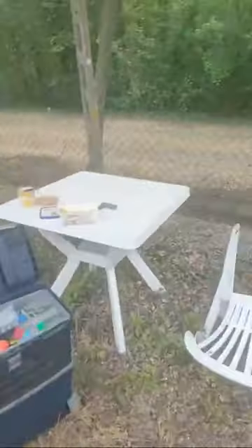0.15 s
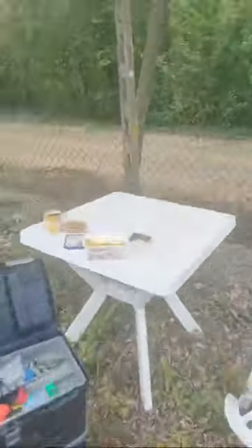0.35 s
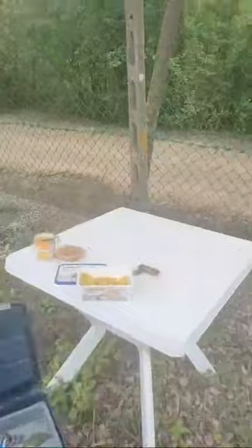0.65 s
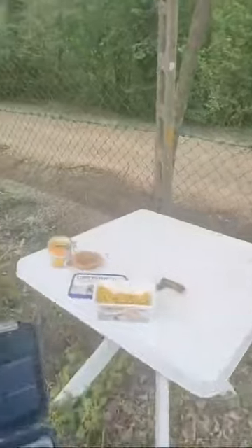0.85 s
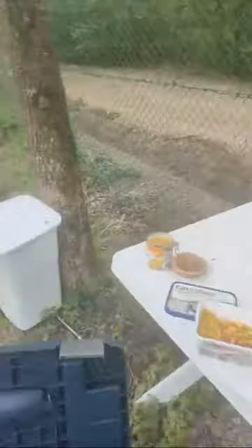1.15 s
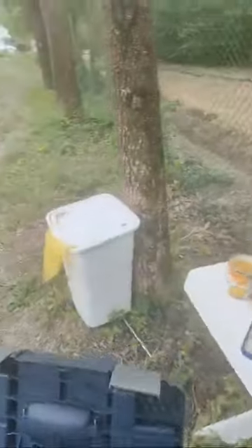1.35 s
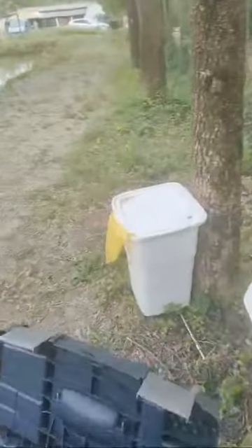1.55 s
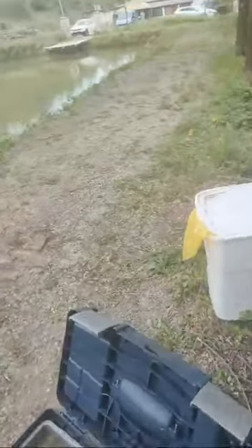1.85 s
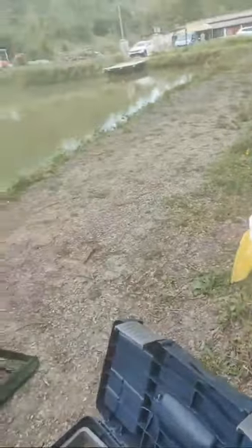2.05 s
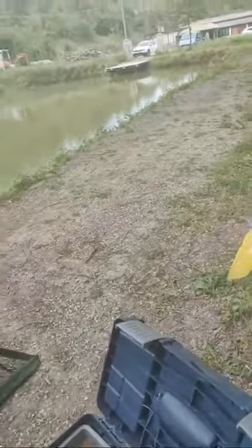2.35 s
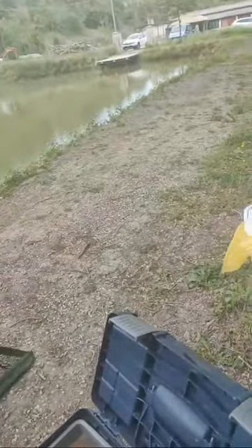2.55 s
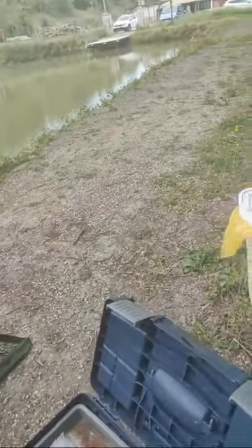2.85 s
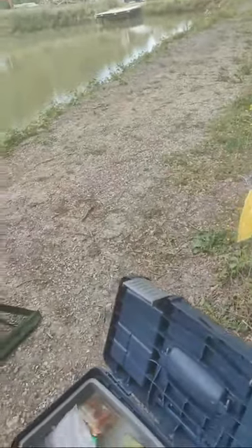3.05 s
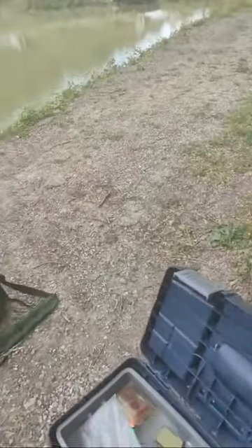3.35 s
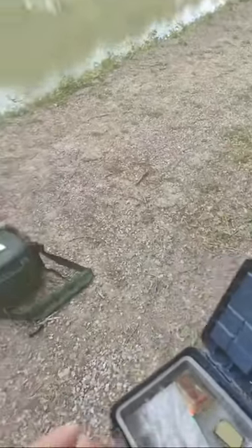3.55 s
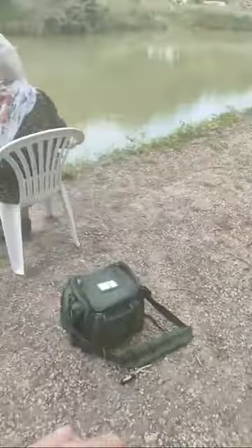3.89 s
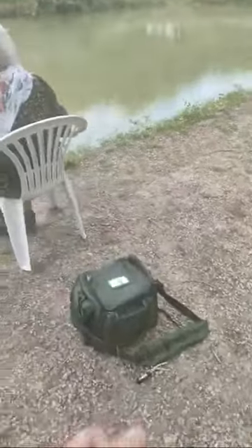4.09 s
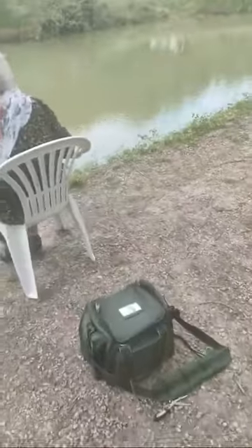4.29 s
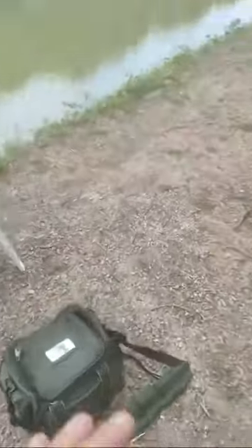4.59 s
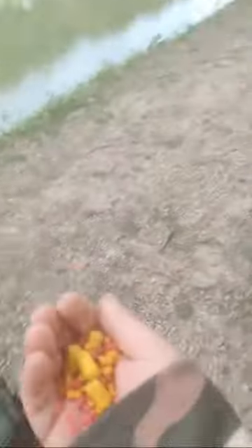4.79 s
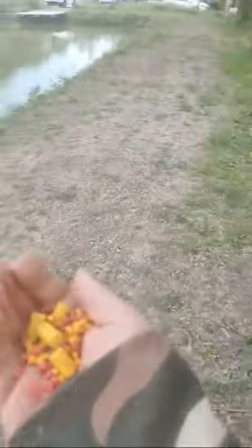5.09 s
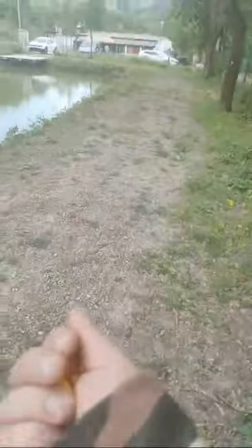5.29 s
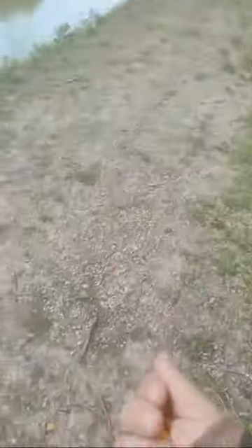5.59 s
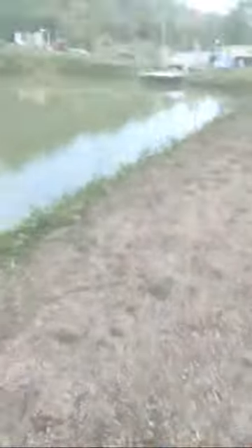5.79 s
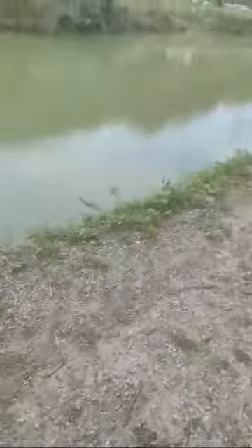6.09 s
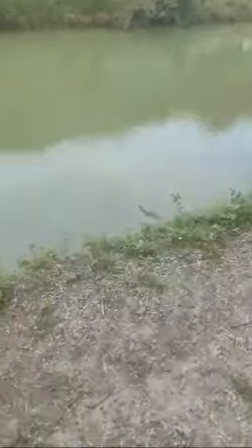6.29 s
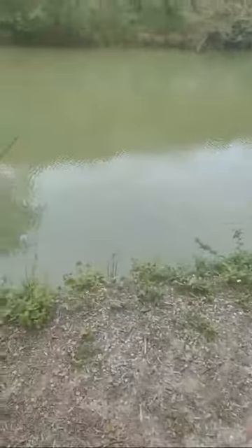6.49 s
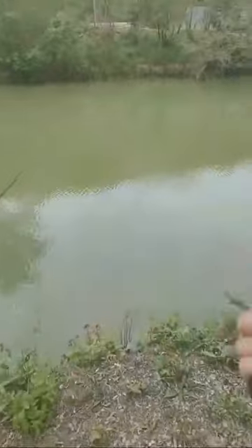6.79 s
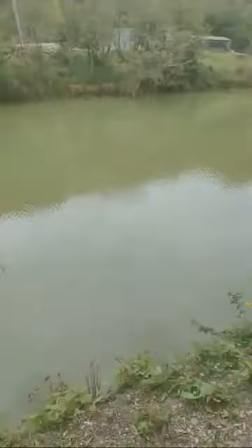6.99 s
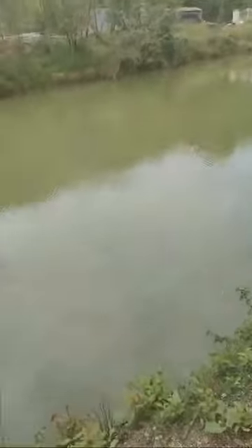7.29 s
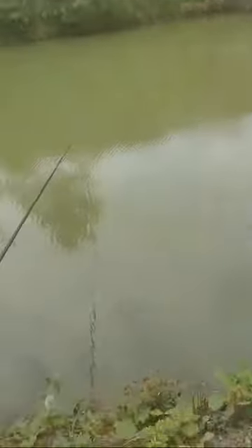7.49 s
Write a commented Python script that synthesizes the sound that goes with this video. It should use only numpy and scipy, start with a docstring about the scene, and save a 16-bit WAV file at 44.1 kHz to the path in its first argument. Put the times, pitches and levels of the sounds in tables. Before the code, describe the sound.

Close, mono, body-worn microphone outdoors by still water. Soft airy hush, light wind lumps and thin bird whistles open it, with weak sole scuffs. Dry grains clatter against a hollow plastic tub for a second. More chirps follow in the calm. In the last third wind thuds low and hard on the microphone, while soles crunch grit and pebbles and twigs tick sharply, densest at the end.

```python
"""Walk along a dry lake bank

A small microphone worn on the body hears gusts: lumps of low noise and short two-cycle pushes.
A hand digs for a second in a plastic tub of bait grains: coloured clicks and cracks of noise.
Soles scuff the dirt (noise through resonances), small things tick (ringing sines), cloth rubs (narrow noise).
Raspy noises, brief or long, and a squeak come and go; a bird whistles gliding, echoing sines over a smooth hush."""
import sys
import numpy as np
from scipy import signal
from scipy.fft import rfft, irfft
from scipy.io import wavfile

SR = 44100
rng = np.random.default_rng(int(sys.argv[2]) if len(sys.argv) > 2 else 0)


def put_to_file(sound):
    """Save the sound as 16-bit audio at rate SR, in the file named by the first command-line argument."""
    columns = np.atleast_2d(sound).T  # one column per channel
    safe = np.clip(columns, -1, 1)
    whole_steps = np.round(safe * 32767)
    wavfile.write(sys.argv[1], SR, whole_steps.astype(np.int16))


def invert_db(x):
    """Field ratio 10**(x/20) for x, a level in decibels (scalar or array-like)."""
    u = np.asarray(x, float) / 20
    return 10 ** u


N = 336924   # length in samples

# strength of the wind on the microphone port, before the puffs add to it: time_s, level_db
WIND_STRENGTH = [(0, -47), (.67, -45.5), (1.08, -50.5), (1.15, -64), (1.45, -48), (1.7, -74.5), (2.0, -61),
                 (2.3, -44), (2.6, -57), (3.9, -70.5), (4.1, -54.5), (4.72, -46.5), (4.96, -66),
                 (5.22, -65), (5.3, -60), (5.72, -71), (5.94, -50.5), (6.15, -35), (6.45, -38.5),
                 (6.55, -28.5), (6.7, -29), (6.95, -46.5), (7.18, -47), (7.32, -33.5), (7.64, -40)]
# single strong puffs: centre_s, level_db, pitch_hz
WIND_PUFFS = [(0.3798, -32.5, 197), (0.649, -35.5, 167), (0.821, -34.5, 176), (1.4302, -35, 135),
              (2.23, -35.5, 81.6), (2.2877, -29, 162), (2.469, -34, 167), (2.658, -40, 189),
              (2.7571, -35.5, 137), (2.9984, -37.5, 122), (3.136, -46.5, 150), (3.3151, -35.5, 113),
              (3.604, -33, 121), (3.7274, -40.5, 136), (3.911, -46, 156), (4.061, -40, 129),
              (4.2985, -27, 133), (4.627, -28.5, 150), (4.7073, -22.5, 183), (4.7253, -21, 125),
              (4.908, -36.5, 172), (5.282, -14.5, 227), (5.3351, -18.5, 160), (5.38, -22, 182),
              (5.4243, -23, 212), (5.525, -28, 162), (5.588, -34.5, 110), (5.959, -25, 139),
              (6.1503, -17, 182), (6.2088, -18.5, 197), (6.2289, -23, 214), (6.2705, -18.5, 189),
              (6.346, -20.5, 211), (6.4187, -27, 154), (6.476, -16.5, 186), (6.5421, -17.5, 155),
              (6.566, -23.5, 180), (6.5886, -22, 179), (6.63, -21.5, 210), (6.667, -17.5, 252),
              (6.728, -22.5, 192), (6.76, -24, 246), (6.822, -37, 127), (6.905, -26, 236),
              (6.9396, -28.5, 159), (7.1066, -25, 155), (7.225, -32, 153), (7.3174, -22, 196),
              (7.3422, -19.5, 181), (7.383, -23.5, 192), (7.428, -24, 193), (7.472, -22, 220),
              (7.52, -18.5, 170), (7.547, -23, 258), (7.603, -18.5, 188)]
# colour of the wind lumps, only the shape counts: pitch_hz, density_db
PORT_COLOUR = [(15, -55), (25, -83.5), (59, 0.5), (171, 5), (229, -2), (600, -28), (700, -32.5), (910, -33),
               (1540, -120)]
# the hand in the tub, whose colour changes as the heap shifts:
# time_s, hollow_level_db, bright_over_hollow_db, airy_over_hollow_db
DIGGING = [(1.83, -64, -11, -9), (1.846, -41, -10, -3), (1.91, -42, -3.5, -3.5), (1.93, -35.5, -8, 2),
           (1.99, -32, -8, -10.5), (2.006, -42, -2.5, -4.5), (2.16, -39, -1.5, -7.5), (2.22, -34, 3, -8.5),
           (2.245, -40.5, 3, -10.5), (2.322, -45.5, -0.5, -9.5), (2.34, -38, 0, -10.5), (2.4, -46, 1, -7),
           (2.7, -46.5, 2, -5.5), (2.718, -57, 1, -12), (2.73, -44.5, 3, -9), (2.755, -58, 4.5, 3),
           (2.815, -37, -0.5, -8), (2.828, -48.5, 0, -14), (2.89, -61, -4, -14)]
# colour of the tub, only the shape counts: pitch_hz, density_db
TUB_COLOUR = [(180, -32), (300, -6), (321, -15.5), (511, -5), (713, -5.5), (801, 0), (978, 3.5), (1300, -6),
              (1930, -7.5), (3300, -7), (3900, 1.5), (4350, -5.5), (4990, -13), (6620, -8), (8220, -25),
              (10600, -24), (16000, -33)]
# grains that knock the tub wall: time_s, bright_level_db, hollow_level_db
WALL_KNOCKS = [(1.849, -42, -36), (1.8829, -26, -32), (1.922, -25.5, -36), (1.953, -25.5, -25),
               (1.974, -32, -18.5), (1.9848, -33, -26.5), (2.099, -38, -39), (2.118, -26, -28),
               (2.137, -29, -28), (2.187, -23.5, -33), (2.229, -41, -26), (2.25, -37, -32),
               (2.271, -44, -30.5), (2.2788, -25, -31.5), (2.33, -20.5, -27), (2.364, -51, -35),
               (2.424, -33.5, -42), (2.4442, -30, -35.5), (2.496, -31.5, -45), (2.528, -39, -36.5),
               (2.5489, -39, -32.5), (2.57, -54, -30), (2.589, -29.5, -42), (2.622, -29, -40),
               (2.641, -31.5, -32), (2.651, -33.5, -32.5), (2.68, -35, -52), (2.7, -33, -40),
               (2.726, -32.5, -49), (2.767, -26, -37), (2.792, -28, -28.5), (2.809, -44, -21.5),
               (2.863, -41, -41)]
# soles on the dirt: start_s, press_s, slide_s, dull_level_db, hissing_level_db, top_level_db
SOLE_SCUFFS = [(.36, 0.031, 0.37, -66, -74, -79), (.8, 0.048, 0.13, -59.5, -68, -64),
               (1.3, 0.076, 0.026, -58, -61, -54.5), (1.39, 0.047, 0.084, -64, -64.5, -64.5),
               (1.642, 0.02, 0.21, -90, -80, -68), (3.055, 0.0047, 0.018, -72, -52.5, -53),
               (3.13, 0.021, 0.14, -83, -66, -68), (3.678, 0.034, 0.035, -72, -74, -72),
               (3.818, 0.02, 0.046, -88, -66, -69.5), (4.018, 0.016, 0.029, -80, -62.5, -72),
               (5.16, 0.12, 0.28, -88, -66.5, -73.5), (5.775, 0.024, 0.077, -49, -43.5, -51),
               (5.83, 0.12, 0.06, -60.5, -47.5, -68), (6.085, 0.045, 0.085, -45.5, -42.5, -51),
               (6.217, 0.019, 0.08, -57.5, -58.5, -70), (6.338, 0.051, 0.19, -61, -65.5, -74),
               (7.247, 0.033, 0.057, -53.5, -54.5, -62), (7.34, 0.07, 0.36, -55.5, -66.5, -72)]
# resonances of the casing that the grit rings in, dull then hissing: pitch_hz, width_hz, relative_level_db
DULL_RESONANCES = [(1264, 200, -1.5), (1644, 175, 1), (2490, 370, 1), (3150, 390, -5.5), (4480, 350, -8),
                   (1800, 5000, -15)]
HISSING_RESONANCES = [(5870, 270, 0.5), (6670, 150, -2.5), (7300, 280, -4), (6600, 4800, -17.5)]
# ticks of stones and twigs: time_s, middle_level_db, own_pitch_hz, low_level_db, high_level_db, top_level_db
STONE_TICKS = [(1.2174, -48, 3010, -74, -69, -63), (2.9792, -44.5, 3740, -54, -68, -89),
               (3.0673, -47, 2060, -66, -56, -57), (3.2595, -47, 2900, -66, -59, -73),
               (3.4924, -54, 3950, -73, -53, -55), (4.809, -30.5, 3480, -59, -51, -88),
               (5.4187, -41.5, 2990, -54, -62, -65), (5.5408, -42, 1920, -49, -72, -80),
               (5.6435, -31, 2080, -41.5, -58, -70), (5.7843, -35.5, 3250, -45.5, -43, -45),
               (6.111, -30.5, 3000, -39, -28, -59), (6.2091, -43, 2440, -46.5, -49, -61),
               (6.25, -48, 2100, -64, -48, -50), (6.328, -41.5, 2500, -51.5, -62, -62),
               (6.4266, -37.5, 3400, -52, -60, -53), (6.57, -32, 2640, -54, -43, -46.5),
               (6.7672, -44, 2020, -61, -56, -47.5), (6.8683, -42.5, 2010, -52, -59, -60),
               (6.9154, -26, 2430, -31.5, -29, -38.5), (7.014, -41, 2350, -51.5, -73, -78),
               (7.0717, -40, 2050, -53, -60, -59), (7.1037, -31.5, 2420, -45.5, -60, -58),
               (7.2647, -35, 1840, -43.5, -50, -44.5), (7.2844, -25.5, 2380, -35.5, -46.5, -42),
               (7.3035, -35, 2270, -40, -43, -53), (7.4153, -36, 1920, -49, -42, -48),
               (7.4347, -30.5, 2100, -38.5, -45.5, -46.5), (7.4629, -25.5, 2160, -47, -65, -67),
               (7.5423, -21, 2900, -29, -34.5, -39.5), (7.6324, -31, 2290, -29.5, -51, -47.5)]
# resonances all ticks share, in groups middle, low, high, top: pitch_hz, relative_level_db, fade_by_60_db_s
SHARED_RESONANCES = [
    [(2450, -8.5, 0.003), (3700, -7.5, 0.0012)],
    [(980, 3.5, 0.0018), (1520, 4, 0.0029)],
    [(5740, 3, 0.002), (6470, 4.5, 0.0073)],
    [(9200, 3, 0.00077), (11500, 4, 0.00038), (14500, -2, 0.00086)],
]
# cloth rubbing by the port, one list for each rub: time_s, centre_hz, level_db
CLOTH_RUBS = [
    [(4.54, 3670, -90), (4.58, 3660, -63.5), (4.66, 3630, -62), (4.73, 3770, -51), (4.775, 3740, -62)],
    [(5.05, 3700, -75), (5.085, 3760, -60), (5.22, 3660, -56), (5.26, 3750, -47), (5.295, 3660, -57.5),
     (5.46, 3800, -72)],
    [(6.48, 3530, -66), (6.53, 3560, -56), (6.64, 3490, -59), (6.67, 3480, -71)],
]
# raspy noises and blurs of distant birdsong, brief or long, silent where the end comes before the start:
# start_s, end_s, centre_hz, width_hz, level_db
RASPS_AND_BLURS = [(5.02, 5.1, 520, 430, -54.5), (5.09, 5.17, 340, 350, -51), (5.04, 5.09, 1750, 400, -58),
                   (4.625, 4.65, 480, 230, -45.5), (0.21, 1.12, 3110, 830, -65),
                   (0.434, 0.513, 2700, 900, -57.5), (1.03, 1.1, 920, 2000, -58.5),
                   (3.055, 3.09, 3950, 890, -49.5), (1.32, 1.43, 5500, 1100, -56.5),
                   (2.8, 3.08, 3750, 360, -66), (3.36, 4.1, 3380, 580, -64.5),
                   (5.775, 5.87, 2760, 710, -51), (5.785, 5.875, 6700, 340, -49),
                   (6.25, 6.9, 6550, 410, -68), (5.96, 6.02, 1500, 200, -60), (6.37, 5.9, 6050, 410, -56.5),
                   (8.3, 7.0, 6520, 340, -66), (6.36, 7.7, 2120, 630, -63), (7.14, 9.4, 2030, 710, -57.5)]
# one brief squeak: start_s, length_s, pitch_hz, level_db
BRIEF_SQUEAK = (7.372, .06, 950, -59)
# bird notes and other brief whistles: start_s, length_s, middle_pitch_hz, glide_hz, level_db
BIRD_NOTES = [(0.303, 0.15, 3960, -69, -66.5), (0.45, 0.029, 3150, -1200, -53),
              (0.485, 0.077, 2835, 92, -54.5), (0.559, .06, 3700, -70, -61),
              (0.562, 0.097, 2930, 78, -61.5), (0.683, 0.023, 3600, 100, -58),
              (0.698, 0.079, 3390, 112, -56.5), (0.775, 0.16, 3110, 110, -62.5),
              (0.966, 0.14, 3596, 3, -57.5), (1.138, 0.12, 2850, 334, -67), (1.261, 0.12, 3780, 40, -61.5),
              (1.355, 0.066, 3490, -100, -52), (1.422, 0.051, 3485, -2, -58), (1.494, 0.09, 2640, 602, -64),
              (1.573, 0.044, 3185, -7, -55), (1.732, 0.044, 2280, -40, -58.5),
              (1.785, 0.082, 1750, 116, -65), (2.484, 0.068, 2216, -150, -47.5),
              (2.837, 0.056, 3130, -260, -56), (2.876, 0.092, 2935, 53, -48), (2.865, .13, 1950, 138, -66),
              (2.967, 0.18, 2060, -38, -59.5), (3.093, 0.042, 2680, 150, -52.5),
              (3.133, 0.037, 2940, 93, -46), (3.167, 0.034, 2650, -650, -57), (3.19, .035, 2380, -32, -62),
              (3.28, 0.12, 3297, -60, -53.5), (3.414, 0.049, 3875, 70, -47.5),
              (3.486, 0.072, 3980, -4, -58), (3.544, 0.1, 3407, -30, -50), (3.63, 0.034, 3050, -1400, -51),
              (3.653, 0.037, 2100, -800, -57), (3.68, 0.056, 2856, -220, -51),
              (3.799, 0.047, 3155, -300, -51.5), (3.838, 0.041, 2610, -400, -57),
              (3.842, 0.14, 3670, 12, -64.5), (7.14, 0.1, 2270, -90, -65), (7.475, 0.078, 2170, 22, -60),
              (7.458, 0.011, 2195, -50, -42), (7.563, 0.05, 2726, -62, -44.5)]
# colour of the outdoor hush, only the shape counts: pitch_hz, density_db
HUSH_COLOUR = [(120, -16), (200, -2.5), (289, -6.5), (409, -4.5), (1120, -13.5), (1710, -17), (2960, -12.5),
               (3830, -17.5), (4520, -21.5), (6520, -21), (7830, -32.5), (15100, -31.5), (16000, -47)]

CONTACT_S = 0.00057   # build-up time of a crack


def rms_one(x):
    """Scales a sound to an average strength (rms) of 1."""
    return x / np.sqrt(np.mean(x ** 2) + 1e-20)


def in_time(spans):
    """Columns of one or more spans of rows, then a switch that is on inside the spans."""
    s, *columns = np.transpose([row for span in spans for row in span])
    t = np.arange(N) / SR
    on = np.zeros(N)
    for span in spans:
        first, last = span[0][0], span[-1][0]
        on += np.interp(t, [first - .006, first, last, last + .012], [0, 1, 1, 0])
    return [np.interp(t, s, c) for c in columns] + [np.minimum(on, 1)]


def coloured(x, spectrum):
    """Shapes x by a spectrum with minimum phase, so nothing sounds early; unit gain for white noise."""
    size = 8192
    hz, db = np.transpose(spectrum)
    bins_hz = np.arange(size // 2 + 1) * SR / size
    log_gain = np.interp(np.log(bins_hz + 1), np.log(hz), db) * np.log(10) / 20
    cepstrum = irfft(log_gain)
    cepstrum[1:size // 2] *= 2
    cepstrum[size // 2 + 1:] = 0
    response = irfft(np.exp(rfft(cepstrum)))
    return signal.fftconvolve(x, response / np.linalg.norm(response))[:N]


def filtered(x, hz, kind):
    """Keeps the part of a sound below ("low"), above ("high") or between ("band") the given pitches."""
    return signal.sosfilt(signal.butter(2, hz, kind, fs=SR, output="sos"), x)


def resonate(x, hz, width_hz):
    """One resonance with gain 1 on top."""
    r = np.exp(-np.pi * width_hz / SR)
    return signal.lfilter([(1 - r * r) / 2, 0, (r * r - 1) / 2],
                          [1, -2 * r * np.cos(2 * np.pi * hz / SR), r * r], x)


def drift(rate_hz):
    """Slow random wander with spread 1."""
    r = np.exp(-2 * np.pi * rate_hz / SR)
    wander = signal.lfilter([1], [1, -2 * r, r * r], rng.standard_normal(N + SR))
    return rms_one(wander[SR:])   # skip the first second, while the filter settles


def grains(per_s, spread_db, bed):
    """Random clicks of uneven size on a bed of noise; rms 1."""
    sizes = invert_db(spread_db * np.minimum(rng.exponential(1, N), 5)) * rng.choice([-1, 1], N)
    clicks = rms_one(sizes * (rng.random(N) < per_s / SR))
    return rms_one(clicks + bed * rng.standard_normal(N))


def ring(clicks, hz, t60):
    """A unit click sets a sine ringing from height 1; it fades by 60 dB in t60 seconds."""
    r, w = invert_db(-60 / (t60 * SR)), 2 * np.pi * hz / SR
    return signal.lfilter([0, np.sin(w)], [1, -2 * r * np.cos(w), r * r], clicks + 1e-18)


def bursts(s, db, length_s, blow=0):
    """Each contact is a crack of noise that builds quickly and dies within a few milliseconds."""
    clicks = np.zeros(N)
    clicks[np.minimum(np.round(s * SR).astype(int), N - 1)] = invert_db(db)
    rise, fall = np.exp(-1 / (CONTACT_S * SR)), np.exp(-1 / (length_s * SR))
    swell = signal.lfilter([1 - rise], np.convolve([1, -rise], [1, -fall]), clicks + 1e-18)
    return swell * rng.standard_normal(N) - blow * clicks


def wind():
    """Eddies hit the port as separate lumps; the strongest are two-cycle pushes with a sharper crest."""
    wake_db, wake_rise_s, wake_fall_s = -14.5, 0.0082, 0.017   # each puff brings buffeting around and after it
    deep_hz, deep_follows, deep_pivot_db = 83, 0.61, -63   # the deepest rumble swings less than the rest
    level_db, _ = in_time([WIND_STRENGTH])
    lumps = grains(per_s=60., spread_db=2.5, bed=0.63) * invert_db(1.9 * drift(20.3))
    lumps = rms_one(coloured(lumps, PORT_COLOUR))

    pushes, stirred = np.zeros(N), np.zeros(N)
    phases = rng.uniform(0, 2 * np.pi, len(WIND_PUFFS))
    for (s, db, hz), phase in zip(WIND_PUFFS, phases):
        cycles = (np.arange(int(4 * SR / hz)) / SR) * hz - 2
        push = np.exp(-(cycles / 0.73) ** 2) * np.sin(2 * np.pi * cycles + phase)
        crest = np.exp(-(cycles / 0.51) ** 2) * np.sin(2 * np.pi * 2.0 * cycles + phase)
        start = int((s - 2 / hz) * SR)
        pushes[start:start + len(cycles)] += (invert_db(db) * (push + invert_db(-18.5) * crest))[:N - start]
        stirred[int(s * SR)] = invert_db(db + wake_db) ** 2

    t = np.arange(-SR // 5, SR // 5) / SR
    wake = np.exp(-np.where(t < 0, -t / wake_rise_s, t / wake_fall_s))
    power = invert_db(level_db) ** 2 + np.abs(signal.fftconvolve(stirred, wake, "same"))
    level = np.sqrt(power)
    deep, rest = filtered(lumps, deep_hz, "low"), filtered(lumps, deep_hz, "high")
    deep_gain = (level / invert_db(deep_pivot_db)) ** (deep_follows - 1)
    buffeting = level * (rest - deep * deep_gain)   # the minus keeps the two halves in step where they meet
    return filtered(pushes + buffeting, 42, "high")


def tub():
    """Grains tumble in a hollow tub: big ones thud, small ones rattle, single knocks share its colour."""
    level_db, bright_db, airy_db, on = in_time([DIGGING])
    big = grains(per_s=350., spread_db=2.5, bed=0.88) * invert_db(1.6 * drift(54))
    small = grains(per_s=900., spread_db=3.5, bed=0.91) * invert_db(1.9 * drift(43))
    big, small = coloured(big, TUB_COLOUR), coloured(small, TUB_COLOUR)
    hollow = rms_one(filtered(big, 1900, "low"))
    bright = rms_one(filtered(small, [2380, 3700], "band")) * invert_db(bright_db + 2.06 * drift(23.0))
    airy = rms_one(filtered(small, [6230, 15000], "band")) * invert_db(airy_db + 2.66 * drift(21.0))
    digging = on * invert_db(level_db) * (hollow + bright + airy)

    s, bright_db, hollow_db = np.transpose(WALL_KNOCKS)
    wall = coloured(rng.standard_normal(N), TUB_COLOUR)   # steady noise that sets the scale of the knocks
    tilt_db = 2.1 * rng.normal(0, 1, len(s))   # each grain cracks duller or sharper
    knock = coloured(bursts(s, hollow_db, 0.0032, blow=4.9), TUB_COLOUR)   # the blow gives a sharp start
    knock = filtered(knock, 1900, "low") / filtered(wall, 1900, "low").std()
    crack = coloured(bursts(s, bright_db - tilt_db, 0.0027), TUB_COLOUR)
    snap = coloured(bursts(s, bright_db + tilt_db, 0.0018), TUB_COLOUR)
    sharp = filtered(crack, [1820, 4600], "band") + filtered(snap, [5800, 15700], "band")
    return digging + knock + sharp / filtered(wall, [1800, 19000], "band").std()


def casing(grit, resonances):
    """Grit noise rings in several casing resonances at once, each wandering in strength."""
    total = np.zeros(N)
    for k, (hz, width_hz, db) in enumerate(resonances):
        total += invert_db(db + 2.5 * drift(13.0)) * resonate(grit, hz, width_hz) * (-1) ** k
    return rms_one(total)


def scuffs():
    """Grit crushed under the sole: coarse grains are dull, fine ones hiss; the sole presses, slides and lifts."""
    touch_db, slide_end_db, lift_s = -11, -10, 0.04   # levels against the crest; time to let go
    fine = grains(per_s=3000.0, spread_db=2.5, bed=0.68) * invert_db(2.0 * drift(22.0))
    coarse = grains(per_s=700.0, spread_db=3.5, bed=1.06)
    dull, hiss = casing(coarse, DULL_RESONANCES), casing(fine, HISSING_RESONANCES)
    top = rms_one(filtered(fine, [9700, 15200], "band") + 0.91 * resonate(fine, 10460, 1200))
    out, t = np.zeros(N), np.arange(N) / SR
    for begin, press, slide, *db in SOLE_SCUFFS:
        length = press + slide + lift_s
        at = slice(int(begin * SR), int((begin + length) * SR))
        since = t[at] - begin
        weight = invert_db(np.interp(since, [0, press, press + slide], [touch_db, 0, slide_end_db]))
        fade = np.clip(np.minimum(2 * since / press, (length - since) / lift_s), 0, 1)
        crunch = invert_db(np.array(db)) @ [dull[at], hiss[at], top[at]]
        out[at] += weight * fade * crunch
    return out


def ticks():
    """Every tick cracks into its own resonance and the shared ones; a little grit scatters after it."""
    own_db, own_t60_s = -4.5, 0.0039   # the resonance that is each stone's own
    debris_db, debris_s = -20.5, 0.012   # the scattering grit
    out, t = np.zeros(N + SR), np.arange(SR // 10) / SR
    fall = np.exp(-t / 0.001) + invert_db(debris_db) * np.exp(-t / debris_s)
    crack = (1 - np.exp(-t / CONTACT_S)) * fall
    for s, middle_db, own_hz, *other_db in STONE_TICKS:
        modes = [(own_hz, middle_db + own_db, own_t60_s)]
        for group_db, group in zip([middle_db, *other_db], SHARED_RESONANCES):
            modes += [(hz, group_db + mode_db, t60) for hz, mode_db, t60 in group]
        start = int(s * SR)
        for hz, level_db, t60 in modes:
            rung = ring(crack * rng.standard_normal(len(t)), hz, t60)
            rung = ring(rung, hz, t60)   # a second time, so less spills to other pitches
            gain = invert_db(level_db + 1.27 * rng.normal())
            out[start:start + len(t)] += gain * rung / np.abs(rung).max()
    return out[:N]


def rubs():
    """Rubbing cloth makes a narrow swish that follows its centre, with weaker overtones above."""
    hz, db, on = in_time(CLOTH_RUBS)
    turn = 2 * np.pi * np.cumsum(hz) / SR
    swish = drift(140) * np.cos(turn) + drift(190) * np.sin(turn)
    overtones = drift(150) * np.cos(1.77 * turn) * invert_db(-13) + drift(200) * np.cos(2.45 * turn) * invert_db(-22)
    return on * invert_db(db) * (swish + overtones)


def rasps():
    """Each rasp or blur is noise through one resonance twice over, swelling and fading within its span."""
    out = np.zeros(N)
    rough = grains(per_s=1500., spread_db=2.0, bed=0.97) * invert_db(2.9 * drift(22))
    for begin, end, hz, width_hz, db in RASPS_AND_BLURS:
        at = slice(int(begin * SR), min(int(end * SR), N))
        rasp = resonate(resonate(rough[at], hz, width_hz), hz, width_hz)
        out[at] += invert_db(db) * rms_one(rasp) * signal.windows.tukey(len(rasp), .7)
    return out


def squeak():
    """Three soft harmonics on a slightly wavering pitch."""
    begin, length, hz, db = BRIEF_SQUEAK
    turn = 2 * np.pi * np.cumsum(hz * (1 + .006 * drift(39.6))) / SR
    share = np.clip((np.arange(N) / SR - begin) / length, 0, 1)   # how much of the squeak has passed
    swell = np.sqrt(np.abs(np.sin(np.pi * share))) * (share < 1)
    harmonics = sum(invert_db(-2 * k) * np.sin((k + 1) * turn) for k in range(3))   # each 2 dB below the last
    return invert_db(db) * swell * harmonics


def birds():
    """Near sines that glide and sag in the middle, smeared by scattered echoes off trunks and bank."""
    sag = 0.019   # share of pitch by which a note's ends lie above its middle
    near_db, echo_db, echo_t60_s = -50.5, -8, 0.23
    song, waver, flutter = np.zeros(N), 1 + 0.0042 * drift(120), invert_db(2.25 * drift(20.0))
    ragged = drift(79.0)
    for begin, length, hz, glide_hz, db in BIRD_NOTES:
        at = slice(int(begin * SR), int((begin + length) * SR))
        share = np.linspace(0, 1, at.stop - at.start)
        pitch = hz * (1 + sag * (2 * share - 1) ** 2) + glide_hz * (share - .5)
        pitch = pitch * waver[at]
        swell = np.minimum(1, np.sin(np.pi * share) * 1.63) ** 2
        # faint, far notes and steep glides (kHz per second) come through ragged
        slope = abs(glide_hz) / length / 1e3
        rough = np.clip(0.22 + 0.12 * (near_db - db) + 0.024 * slope, 0, 1)
        swell = swell * (np.sqrt(1 - rough ** 2) + rough * ragged[at])
        whistle = np.sqrt(2) * np.sin(2 * np.pi * np.cumsum(pitch) / SR)
        song[at] += invert_db(db) * swell * flutter[at] * whistle
    t = np.arange(SR // 2) / SR
    echoes = rng.standard_normal(len(t)) * invert_db(-60 * t / echo_t60_s) * (t > .008)
    echoes = echoes / np.linalg.norm(echoes)
    return song + invert_db(echo_db) * signal.fftconvolve(song, echoes)[:N]


def hush():
    """Far leaves, water and traffic: smooth noise that swells slowly."""
    level_db = -62.5 + 1.0 * drift(0.9)
    return invert_db(level_db) * coloured(rng.standard_normal(N), HUSH_COLOUR)


def scene():
    """All sources added together in one channel."""
    near = wind() + tub() + scuffs() + ticks() + rubs() + rasps() + squeak()
    return (near + birds() + hush())[None]


def low_pass(x):
    """Removes everything above the highest recorded frequency."""
    return signal.sosfilt(signal.butter(12, 16950, fs=SR, output="sos"), x)


def record(dry):
    """Turns the sum of the sources into the finished sound."""
    return low_pass(dry)


dry = scene()
out = record(dry)
put_to_file(out)
```